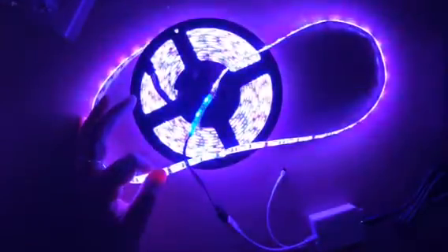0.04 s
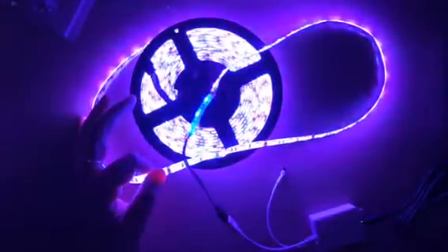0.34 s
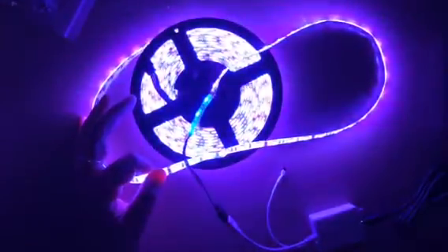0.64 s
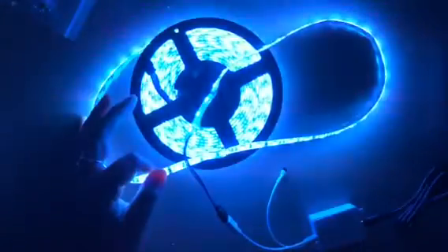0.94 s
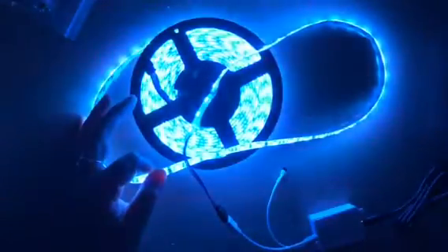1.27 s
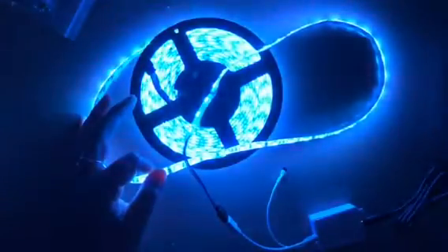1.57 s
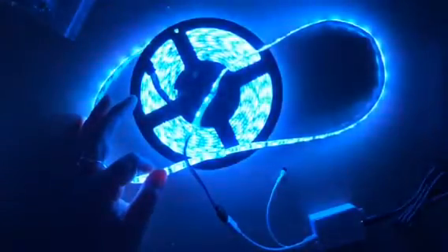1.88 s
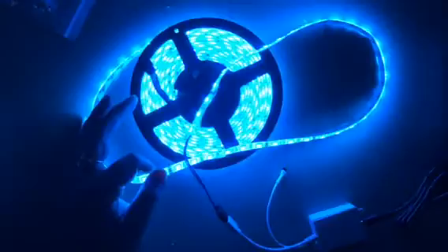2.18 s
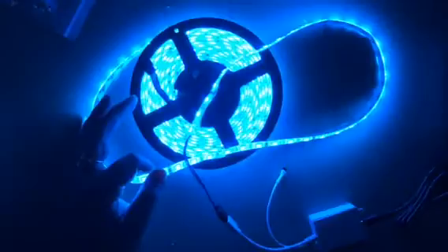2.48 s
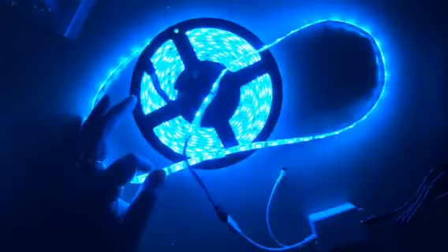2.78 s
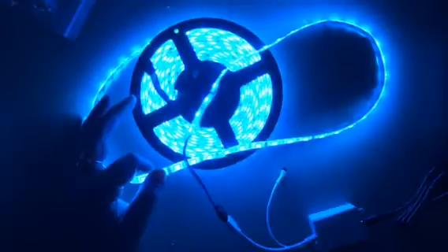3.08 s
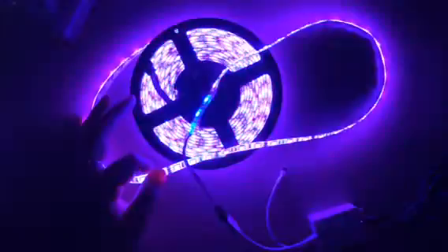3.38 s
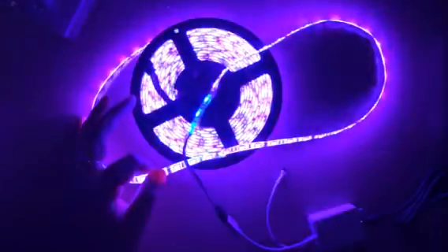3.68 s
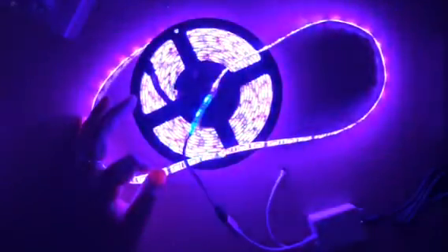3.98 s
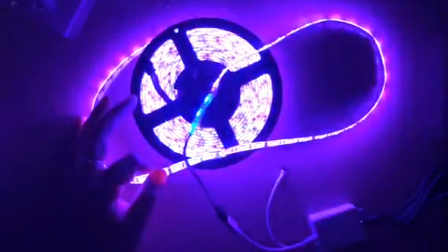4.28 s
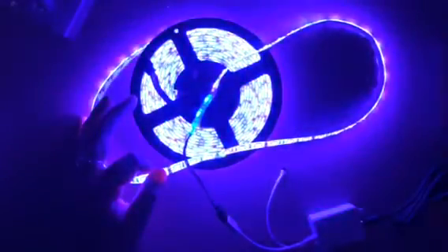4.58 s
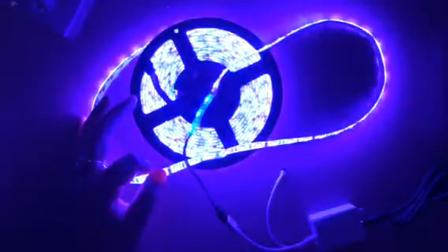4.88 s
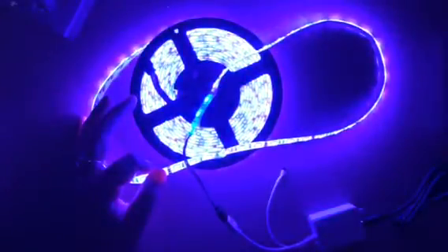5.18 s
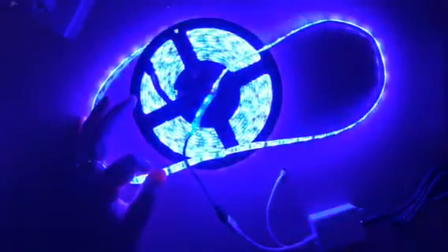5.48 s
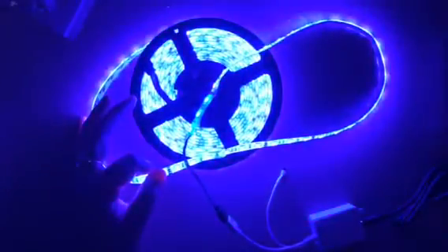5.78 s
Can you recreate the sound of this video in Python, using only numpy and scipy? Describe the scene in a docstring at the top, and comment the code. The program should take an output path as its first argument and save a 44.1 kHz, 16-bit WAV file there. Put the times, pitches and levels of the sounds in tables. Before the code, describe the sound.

Close to a single microphone in a quiet room, a small plastic remote control is pressed at uneven intervals. It starts with two soft clicks and a slight finger rub. Past the middle come a crisp click, a dull knock and another crisp click, followed by a couple of tiny ticks. Behind it all runs a low electrical hum with the gentle throb and airy hiss of a fan-like motor.

```python
"""Remote control in a humming room

A quiet room, one microphone. Close by, the buttons of a small plastic remote control are pressed:
two clear clicks and a few faint ticks ring its case, and fingers slide softly over the plastic.
Behind them sit a low 120 Hz mains hum and a fan-like motor that turns 18.5 times a second,
throbs a little and moves some air."""
import sys
import numpy as np
from scipy import signal
from scipy.fft import rfft, irfft
from scipy.io import wavfile

SR = 44100
rng = np.random.default_rng(int(sys.argv[2]) if len(sys.argv) > 2 else 0)


def bounce(signal):
    """Save signal as a 16-bit WAV file at the path given by the first command-line argument."""
    frames = np.transpose(np.atleast_2d(signal))
    limited = np.clip(frames, -1, 1)
    pcm = np.round(limited * 32767).astype(np.int16)
    wavfile.write(sys.argv[1], SR, pcm)


N = 266364
TIME = np.arange(N) / SR


def remote(snap_low_hz=2200, knock_q=2.1):
    """Close up, each press rings the case by the spot pressed, with a dull knock and a bright snap."""
    # presses and finger taps: (time [s], case ring [dB], lift of the second mode [dB], snap [dB],
    # top of the snap [Hz], knock [dB], knock pitch [Hz])
    clicks = [(0.7395, -11.5, -5, -27.5, 9500, -10, 1080), (2.0958, -13.5, -6, -30, 8500, -9.5, 1250),
              (3.3254, 2.5, 1.5, -25, 11000, -17, 1200), (3.5602, -24, 0, -45, 7000, -3, 470),
              (4.238, -28, 0, -30, 9000, -26, 1300), (4.3918, -0.5, -3, -15.5, 9700, -4.5, 1070),
              (5.3545, -18, 0, -27.5, 8000, -24, 1400), (5.7285, -21, 0, -30, 8000, -26, 1400)]
    # modes of the plastic case: (frequency [Hz], width of each filter pass [Hz], gain [dB])
    case_modes = [(2080, 380, 0), (2490, 400, -0.5), (4700, 600, -20), (5450, 550, -16.5), (5950, 450, -11),
                  (7950, 500, -22), (9200, 500, -21)]
    out = np.zeros(N + SR)
    for at, ring_db, second_db, snap_db, snap_top_hz, knock_db, knock_hz in clicks:
        force = press(rattle_db=-1, room_db=-9.5, room_t60=0.14)
        ring = sum(from_db(db + second_db * (k == 1)) * resonate(force, hz, width)
                   for k, (hz, width, db) in enumerate(case_modes))
        knock = resonate(force, knock_hz, knock_hz / knock_q)
        snap_band = np.vstack([signal.butter(1, snap_low_hz, "high", fs=SR, output="sos"),
                               signal.butter(2, snap_top_hz, "low", fs=SR, output="sos")])
        snap = signal.sosfilt(snap_band, press(rattle_db=2, room_db=-3, room_t60=0.065))
        click = from_db(ring_db) * ring + from_db(snap_db) * snap + from_db(knock_db) * knock
        start = round(at * SR)
        out[start:start + len(click)] += click
    return out[:N]


def press(rattle_db, room_db, room_t60, strike_s=0.0004, rattle_s=0.0076):
    """The button gives way within a millisecond and rattles briefly; the room adds a short tail."""
    t = TIME[:SR // 4]
    strike, rattle, room = rng.standard_normal((3, len(t)))
    strike = unit_energy(whiten(strike * (t < strike_s)) * (t < 2 * strike_s))
    rattle_gate = (t > strike_s) / (1 + np.exp(np.minimum(10 * (t / rattle_s - 1), 20)))
    rattle = unit_energy(whiten(rattle * rattle_gate) * rattle_gate)
    room = unit_energy(room * (t > rattle_s) * from_db(-60 * t / room_t60))
    return unit_energy(strike + from_db(rattle_db) * rattle + from_db(room_db) * room)


def fingers(attack_s=0.043, q=0.9):
    """Faint, broad friction on the plastic rises quickly and fades as the finger comes to rest."""
    # finger slides: (start [s], length [s], rms level before the envelope [dB], centre [Hz])
    rubs = [(0.718, 0.51, -62, 1240), (5.3, 0.82, -71, 6000)]
    out = np.zeros(N)
    for start, length, db, hz in rubs:
        friction = resonate(rng.standard_normal(N), hz, hz / q)
        age = TIME - start
        speed = np.clip(age / attack_s, 0, 1) * np.clip(1 - age / length, 0, 1)
        out += from_db(db) * np.sqrt(speed) * friction / friction.std()
    return out


def motor_hum(mains_hz=60.0, shaft_hz=18.5, drone_hz=58.42, beat_top_s=2.75):
    """Magnetic hum at twice the mains rate, shaft orders and sidebands, over a throbbing low drone."""
    # motor tones: (multiple of the mains rate, multiple of the shaft rate)
    orders = [(0, 1), (0, 2), (0, 11), (0, 12), (0, 14), (2, 0), (2, -1), (2, -2), (2, 3)]
    # the same tones in turn: (rms level [dB])
    levels = [-31.5, -62.5, -68, -74.5, -71.5, -44, -57.5, -59, -71]
    motor = sum(tone(mains * mains_hz + turns * shaft_hz, db, wander_rad=0.021, crest_s=rng.random())
                for (mains, turns), db in zip(orders, levels))
    # the shaft's third order beats with the drone about three times a second
    third_order = tone(3 * shaft_hz, db=-56.5, wander_rad=0.081, crest_s=beat_top_s)
    drone = tone(drone_hz, drone_db(), wander_rad=0.14, crest_s=beat_top_s)
    return motor + third_order + drone


def drone_db(rest_db=-51.5, waver_db=2.5, waver_hz=2.5, swell_s=0.085):
    """The drone wavers at random around its resting level; each swell adds a bell-shaped rise."""
    # the drone's strongest swells: (time of the top [s], added rms level [dB])
    swells = [(0.47, -48), (2.72, -43.5), (3.1, -43), (4.08, -50), (4.8, -48), (6.03, -46)]
    resting = from_db(rest_db + waver_db * drift(waver_hz))
    rises = sum(from_db(db) * np.exp(-((TIME - at) / swell_s) ** 2) for at, db in swells)
    return 20 * np.log10(resting + rises)


def air():
    """The room tone: steady turbulence, made slightly hollow by resonances."""
    # spectrum of moving air and hiss: (frequency [Hz], power density [dB per Hz])
    spectrum = [(10, -62.5), (22, -67.5), (40, -62), (62, -65), (80, -69), (145, -69), (200, -78.5),
                (290, -86.5), (750, -91.5), (1800, -94.5), (6500, -101.9), (9500, -104.5), (11500, -108.7),
                (15000, -119.3)]
    # resonances that colour the air: (centre [Hz], width [Hz], lift [dB])
    resonances = [(372, 34, 5), (426.4, 46, 7.5), (560.5, 65, 7.5), (646, 85, 6), (859, 84, 4),
                  (955, 39, 8.5), (1020, 32, 7), (1131, 89, 8), (1397, 60, 9.5), (1487, 85, 8),
                  (1632, 100, 6), (1733, 43, 3), (2009, 116, 7), (2140, 52, 7), (2416, 145, 5.5),
                  (2790, 110, 2), (2974, 100, 9), (3140, 70, 4), (3533, 50, 5.5), (3876, 65, 7.5),
                  (4050, 94, 5.5), (4270, 400, 2.5), (4620, 85, 7), (5110, 210, 4), (8160, 720, 3),
                  (8680, 130, 4)]
    hz = np.maximum(np.fft.rfftfreq(N, 1 / SR), 1)
    points_hz, points_db = np.transpose(spectrum)
    db = np.interp(np.log(hz), np.log(points_hz), points_db)
    for centre, width, lift in resonances:
        db += lift * .5 ** ((2 * (hz - centre) / width) ** 2)
    return irfft(rfft(rng.standard_normal(N)) * from_db(db), N) * np.sqrt(SR / 2)


def resonate(x, hz, width_hz):
    """A two-pole resonance with a peak gain of one, run twice to keep the valleys between modes dark."""
    r = np.exp(-np.pi * width_hz / SR)
    b = np.array([1, 0, -1]) * (1 - r * r) / 2
    a = [1, -2 * r * np.cos(2 * np.pi * hz / SR), r * r]
    return signal.lfilter(b, a, signal.lfilter(b, a, x))


def whiten(burst):
    """Make a short run of contacts equally strong at all frequencies."""
    return irfft(np.exp(1j * np.angle(rfft(burst))), len(burst))


def tone(hz, db, wander_rad, crest_s):
    """A sine of given rms level with a crest near a given time; its phase wanders slowly."""
    phase = 2 * np.pi * hz * (TIME - crest_s) + wander_rad * drift(rate_hz=0.47)
    return np.sqrt(2) * from_db(db) * np.cos(phase)


def drift(rate_hz):
    """Slow random wander with a spread of one."""
    hz = np.fft.rfftfreq(N, 1 / SR)
    slow = irfft(rfft(rng.standard_normal(N)) / (1 + (hz / rate_hz) ** 2), N)
    return (slow - slow.mean()) / slow.std()


def from_db(db):
    """Decibels to gain."""
    return 10 ** (np.asarray(db) / 20)


def unit_energy(x):
    """Scale so that the squares sum to one."""
    return x / np.sqrt(np.sum(x ** 2) + 1e-20)


def scene():
    """One microphone hears the room's hum and air, with the remote and the fingers close by."""
    return (motor_hum() + air() + remote() + fingers())[None]


def record(dry, cutoff_hz=15100):
    """A steep low-pass cuts the highest treble."""
    return signal.sosfilt(signal.ellip(10, .1, 80, cutoff_hz, fs=SR, output="sos"), dry)


dry = scene()
out = record(dry)
bounce(out)
```